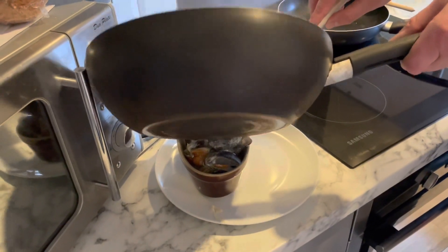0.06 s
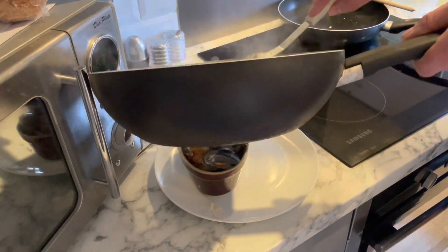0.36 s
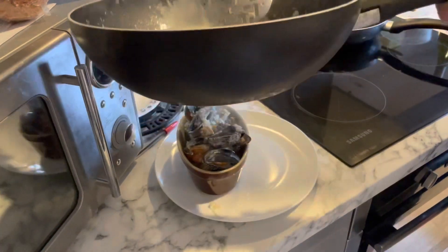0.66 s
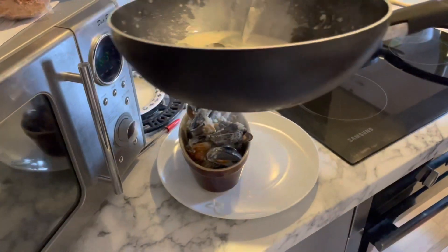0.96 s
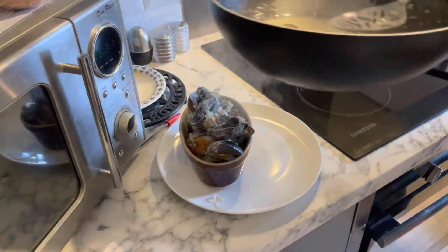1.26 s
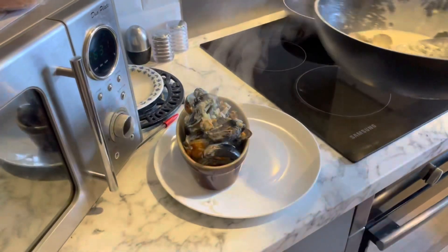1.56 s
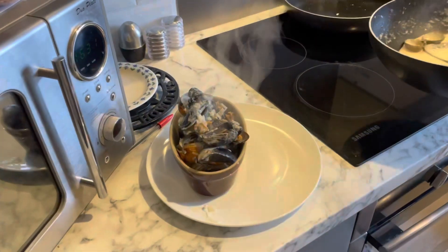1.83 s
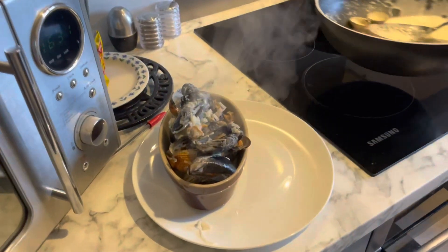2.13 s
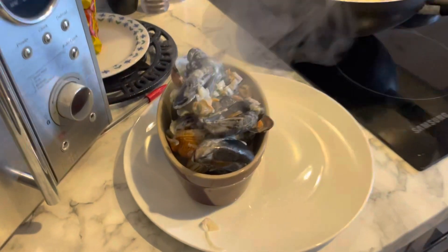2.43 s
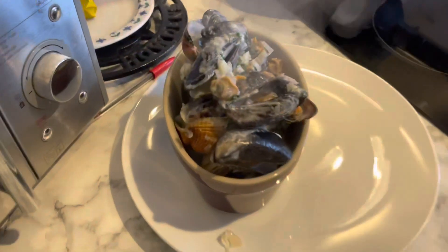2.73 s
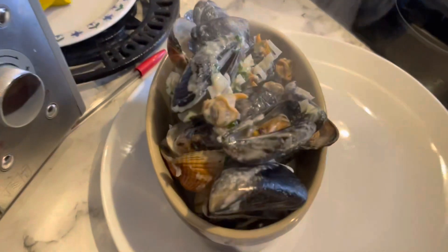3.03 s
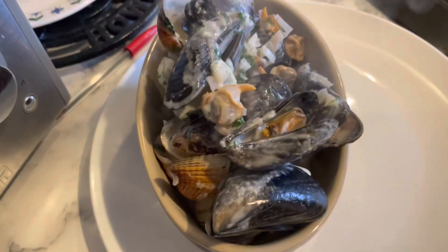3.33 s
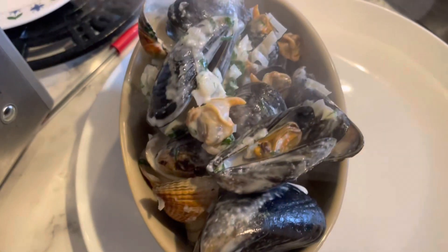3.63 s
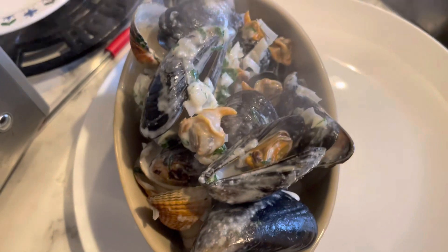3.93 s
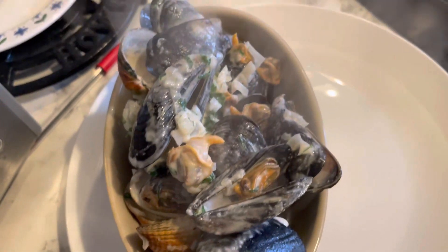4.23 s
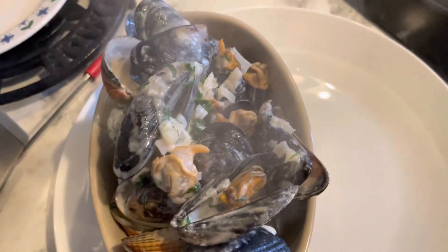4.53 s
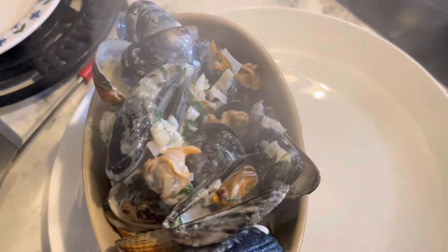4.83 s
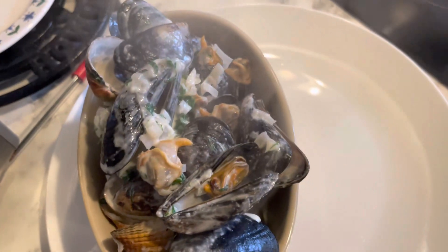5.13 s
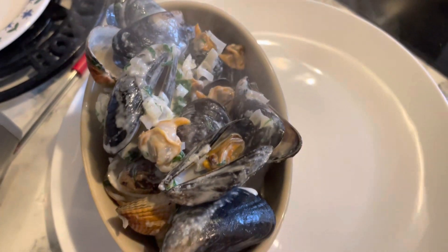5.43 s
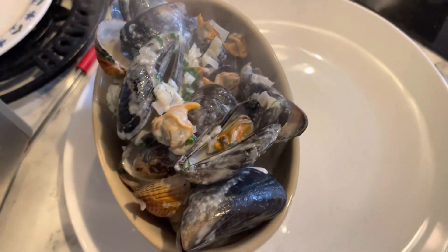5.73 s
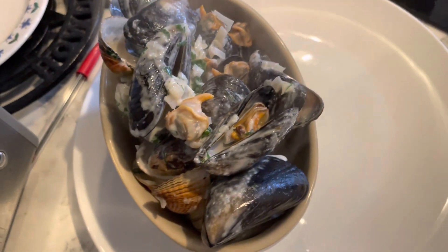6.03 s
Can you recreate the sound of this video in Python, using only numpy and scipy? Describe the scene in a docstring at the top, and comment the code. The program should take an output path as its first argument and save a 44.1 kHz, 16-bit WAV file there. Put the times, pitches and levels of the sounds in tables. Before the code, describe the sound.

A fan hums in a small kitchen while a hot dish hisses faintly. Crockery clinks once and a spoon knocks several times in a metal pan. The pan scrapes, taps and lands on a glass hob with a loud clatter. Soft handling thuds and rustling clothes follow right at the hand-held phone's microphone, and among them a wooden cupboard door shuts further off with a dull knock.

```python
"""A small kitchen, heard from a hand-held phone; a fan hums and a hot dish hisses faintly throughout.
A spoon knocks in a pan just emptied of shellfish, and crockery clinks once. Carried back to the glass
hob, the pan scrapes, taps and lands with a clatter at 2.5 s, as the phone moves in close over the dish.
Then come soft thuds of handling and the rustle of clothes, right at the microphone; amid them,
at 4.6 s, a cupboard door shuts further off with a dull wooden knock."""
import sys
import numpy as np
from scipy import signal
from scipy.fft import rfft, irfft, next_fast_len
from scipy.io import wavfile

SR = 44100
rng = np.random.default_rng(int(sys.argv[2]) if len(sys.argv) > 2 else 0)


def dump(signal):
    """Clip the signal to [-1, 1] and save it as 16-bit WAV at the path in sys.argv[1]."""
    limited = np.clip(np.atleast_2d(signal).T, -1, 1)
    pcm = np.round(limited * 32767).astype(np.int16)
    wavfile.write(sys.argv[1], SR, pcm)


N = 272538
TIME = np.arange(N) / SR
AGE = np.arange(SR // 2) / SR  # seconds since a blow

# the pan's wall: (frequency [Hz], level [dB], t60 [s])
PAN_MODES = [(665, -0.5, 0.78), (698, 4.5, 0.5), (1152, 9.5, 0.19), (1228, 3, 0.69), (1266, -4, 0.22),
             (1522, 7, 0.18), (1580, -0.5, 0.18), (1970, 3, 0.24), (2174, 2, 0.16), (2410, -17, 0.12),
             (2456, 12, 0.08), (2650, 1, .15), (2880, 8, 0.19), (2970, 0, 0.16), (3300, -4, 0.15),
             (3400, 3.5, 0.24), (3760, -2, .13), (4130, 2.5, 0.35), (4420, -3, 0.2), (4856, 0, 0.23),
             (5350, 6, 0.13), (6050, 4, 0.23), (6560, 8, .14)]
# cloth and fingers close to the microphone: (frequency [Hz], level [dB])
RUB_SPECTRUM = [(200, 9), (500, -7.5), (1200, -2), (2800, 2), (4500, 1.5), (7000, -1), (9000, 6.5),
                (11500, 8.5), (13500, 3), (16000, -14)]
SLOSH, SLOSH_PER_S = .011, 110  # sauce in the pan makes each mode waver: share of its pitch, turns per s


def undb(db):
    """Decibels to gain."""
    return 10 ** (np.asarray(db) / 20)


def unit(x):
    """Scale to rms 1."""
    return x / np.sqrt(np.mean(x ** 2))


def unit_hit(x):
    """Scale a blow so that its energy equals rms 1 held for 30 ms."""
    energy = np.sum(np.mean(np.atleast_2d(x) ** 2, axis=0))
    return x / np.sqrt(energy / (.03 * SR))


def at_hz(points, hz):
    """Read (frequency [Hz], value) points on a log-frequency axis."""
    point_hz, value = np.transpose(points)
    return np.interp(np.log(hz + 1), np.log(point_hz), value)


def colour(x, spectrum, tilt_db=0):
    """Causal filter with the given spectrum, tilted by some dB an octave."""
    size = 2 * next_fast_len(x.shape[-1] // 2 + 2048)
    hz = np.arange(size // 2 + 1) * SR / size
    db = at_hz(spectrum, hz) + tilt_db * np.log2(np.maximum(hz, 200) / 1000)
    cepstrum = irfft(np.log(undb(db)))
    cepstrum[1:size // 2] *= 2  # fold to minimum phase
    cepstrum[size // 2 + 1:] = 0
    return irfft(rfft(x, size) * np.exp(rfft(cepstrum)))[..., :x.shape[-1]]


def fade(t60):
    """Free decay of 60 dB in t60 seconds."""
    return np.exp(-np.log(1000) * AGE / t60)


def damped_sine(hz, t60):
    """One freely decaying mode."""
    return fade(t60) * np.sin(2 * np.pi * hz * AGE)


def stroke(s, length, attack, release_t60):
    """Envelope of a sliding contact: it swells, then dies away once its length is up."""
    age = TIME - s
    swell = np.clip(age / attack, 0, 1) ** 2
    return swell * np.exp(-np.log(1000) * np.maximum(age - length, 0) / release_t60)


def walk(per_s, time=TIME):
    """Random wandering with a spread near 1."""
    knots = rng.standard_normal(8192)
    return np.interp(time * per_s, np.arange(len(knots)), knots)


def add(out, s, sound):
    """Mix a stereo sound in at time s."""
    start = max(int(s * SR), 0)
    out[:, start:start + sound.shape[1]] += sound[:, :N - start]


def spread(mid, side):
    """Left and right; long waves reach both microphone ports much alike."""
    # stereo width: (frequency [Hz], side re mid [dB])
    width = [(40, -9.5), (125, -11), (250, -14.5), (500, -2), (1000, -3.5), (4000, -5.5), (10000, 0.5),
             (14000, -21.5)]
    side = colour(side, width)
    return np.array([mid + side, mid - side])


def in_kitchen(x, wet_db):
    """A blow plus dense reflections from tiles and worktop, scaled as a unit hit."""
    # the room's decay, longest in the bass: (frequency [Hz], t60 [s])
    room_t60 = [(100, 0.52), (500, 0.43), (2000, 0.28), (6000, 0.31), (14000, 0.26)]
    hz, s, cells = signal.stft(rng.standard_normal((2, len(AGE))), SR, nperseg=256)
    cells = cells * np.exp(-np.log(1000) * s / at_hz(room_t60, hz)[:, None])
    tail = signal.istft(cells, SR)[1][:, :len(AGE)] * (AGE > .0008)
    tail = tail * (1 + 2.6 * fade(0.05))  # nearby surfaces answer first and loudest
    response = undb(wet_db) * spread(*tail) / np.sqrt(np.sum(tail ** 2))
    response[:, 0] += 1  # direct sound
    return unit_hit(signal.fftconvolve(x[None], response, axes=1)[:, :len(x)])


def ring(modes, scatter_db=1, waver=0):
    """Decaying modes; each radiates its own pattern and reaches the two ports in different phase."""
    chance = rng.uniform(-1, 1, (len(modes), 3))
    port_phase = np.array([[1], [-1]]) * np.pi / 3
    out = 0
    for (hz, db, t60), (sign, scatter, lead) in zip(modes, chance):
        clock = AGE + waver * np.cumsum(walk(SLOSH_PER_S, AGE)) / SR
        gain = np.sign(sign) * undb(db + scatter_db * scatter)
        out = out + gain * fade(t60) * np.sin(2 * np.pi * hz * clock + lead * port_phase)
    return unit_hit(out * (1 - np.exp(-AGE / 0.0032)))


def crack(spectrum, t60, tilt_db=0, *, snap, wet_db):
    """A sharp contact of strength snap, then a crowd of heavily damped modes, heard in the room."""
    burst = rng.standard_normal(len(AGE)) * fade(t60)
    burst[0] = snap * np.sqrt(np.sum(burst ** 2))
    return in_kitchen(colour(burst, spectrum, tilt_db), wet_db)


def friction(spectrum, grain_db, jerk_db, jerks_per_s):
    """Countless tiny slips of uneven size, coming in jerks."""
    size = np.minimum(rng.exponential(size=N), 4)
    noise = rng.standard_normal((2, N))
    slips = noise * undb(grain_db * size + jerk_db * np.tanh(walk(jerks_per_s)))
    return unit(spread(*colour(slips, spectrum)))


def nearness():
    """0 while the phone stands back, 1 once it has moved in over the dish."""
    return np.interp(TIME, (2.3, 3.3), (0, 1))


def free_to_ring():
    """Gain of the pan's sound: full in the hand, 7 dB down once the glass chokes the wall."""
    return undb(np.interp(TIME, (2.555, 2.59), (0, -7)))


def fan():
    """Rumbling air, housing resonances and wavering mains hum; air and hum grow as the phone nears."""
    # moving air: (frequency [Hz], level [dB])
    air_spectrum = [(22, -46), (38, -14), (58, 3), (80, 0.5), (110, -0.5), (170, 4.5), (250, -4),
                    (350, -10), (520, -21.5), (1400, -23), (1750, -26), (2150, -32.5), (3500, -33.5),
                    (7000, -45.5), (12000, -55), (16000, -81)]
    # the fan's housing: (frequency [Hz], bandwidth [Hz], level [dB])
    housing_modes = [(334.6, 9, -52.5), (677.4, 4.3, -61), (1320, 240, -60), (2040, 390, -56),
                     (2400, 80, -80), (3880, 430, -66)]
    # mains hum before the phone moves in: (frequency [Hz], level [dB])
    hum_partials = [(100.3, -43), (200, -47.5)]
    air_db, air_near_db, hum_near_db = -38, 3, 4.5
    air = unit(spread(*colour(rng.standard_normal((2, N)), air_spectrum))) * undb(walk(9.9))
    housing = hum = 0
    for hz, width, db in housing_modes:
        resonance = signal.lfilter(*signal.iirpeak(hz, hz / width, SR), rng.standard_normal((2, N)))
        housing += undb(db) * unit(spread(*resonance))
    for hz, db in hum_partials:
        peak = np.sqrt(2) * undb(db + 3.7 * walk(7.8))
        hum += peak * np.sin(2 * np.pi * hz * TIME + .5 * walk(3.0))
    return air * undb(air_db + air_near_db * nearness()) + housing + hum * undb(hum_near_db * nearness())


def dish_hiss():
    """The hot dish hisses faintly, louder as the pan swings clear and as the phone nears."""
    # the steaming dish: (frequency [Hz], level [dB])
    steam_spectrum = [(1000, -11), (2500, 9.5), (5000, -2.5), (8000, 0), (12000, 2.5), (14000, -12),
                      (16000, -59)]
    covered_db = np.interp(TIME, (0.82, 1.4), (-4, 0))
    db = -60 + 1.5 * nearness() + covered_db
    steam = unit(spread(*colour(rng.standard_normal((2, N)), steam_spectrum)))
    return steam * undb(db + 0.82 * walk(13))


def pan_knocks():
    """A spoon knocks in the pan, then the lowered pan taps the hob; each contact clicks and rings."""
    # knock on metal: (frequency [Hz], level [dB])
    click_spectrum = [(200, -35), (600, -4), (1500, 8), (3500, 9), (6000, 1), (9000, 3), (13000, -9.5),
                      (16000, -34)]
    # knocks: (time [s], level [dB], tilt [dB/octave], ring re click [dB], ring centre [Hz],
    # damping t60 [s], note [Hz], note re click [dB], note t60 [s])
    knocks = [(.054, -41.5, -7.5, -11, 700, .5, 1270, -5, 0.086),
              (1.246, -31.5, 0.5, -0.5, 420, 7.2, 1107, 0, 0.053),
              (1.412, -51.5, -0.5, 7, 1100, .5, 1220, 11, .08), (1.546, -46, -1, 5, 1400, .5, 1227, 1, .12),
              (1.605, -28, -1, 2, 2300, 0.89, 1230, -0.5, 0.17),
              (1.631, -29, -1, -2, 1500, .9, 1246, 6, 0.14),
              (1.670, -34, -5, 14, 1200, 0.33, 1179, 16, 0.11),
              (1.787, -32, 2, 2.5, 3350, 2.1, 2335, -7, 0.05),
              (1.919, -55, 13.5, -12, 5000, .1, 5540, 15, 0.0096),
              (2.418, -41.5, -2, -2, 914, .4, 680, 6, 0.09),
              (2.467, -29.5, -3.5, -3, 900, 0.33, 695, 3, 0.24),
              (2.491, -28.5, -5.5, 4, 1490, .35, 678, 4, 0.22),
              (2.504, -30, -10, 9, 1800, 0.19, 1230, 13, 0.18),
              (2.535, -35.5, -8, -2, 1200, .2, 1212, 16, .13)]
    rebound_s, rebound_db = 0.0099, -6
    focus_db = 5.5  # lost per octave from the modes that the struck spot favours
    out = np.zeros((2, N))
    for s, db, tilt_db, ring_db, centre_hz, damping_t60, note_hz, note_db, note_t60 in knocks:
        click, rebound = (crack(click_spectrum, 0.021, tilt_db, snap=0.43, wet_db=10) for _ in range(2))
        rebound = np.pad(rebound, ((0, 0), (int(rebound_s * SR), 0)))[:, :len(AGE)]
        clicks = unit_hit(click + undb(rebound_db) * rebound)
        note = in_kitchen(damped_sine(note_hz, note_t60), wet_db=-1)
        favoured = [(hz, mode_db - focus_db * abs(np.log2(hz / centre_hz)), t60)
                    for hz, mode_db, t60 in PAN_MODES]
        wall = ring(favoured, scatter_db=1.5, waver=SLOSH) * fade(damping_t60)
        # reflections make the ring swell and beat
        wall = unit_hit(unit_hit(wall) + undb(-4) * in_kitchen(wall[0], wet_db=12))
        add(out, s, undb(db) * unit_hit(clicks + undb(ring_db) * wall + undb(note_db) * note))
    return out * free_to_ring()


def thud(centre_hz, focus_db=27, rise_s=0.0049):
    """A soft push rumbles and swells the worktop's modes, focus_db weaker per octave off its own pace."""
    # the worktop and the units under it: (frequency [Hz], level [dB], t60 [s])
    worktop_modes = [(66.1, 0, 0.58), (100.6, 3.5, 0.32), (116, -10.5, 1), (164.8, 0, 0.48),
                     (203.2, 3, 0.31), (332.3, -5, 0.57), (384, -16, 0.48), (400, -11, 0.35)]
    # the short rumble: (frequency [Hz], level [dB])
    rumble_spectrum = [(30, -20.5), (60, -5.5), (170, 2), (260, -16.5), (400, -17.5), (700, -33.5),
                       (1500, -41), (5000, -78)]
    boom = sum(undb(db - focus_db * abs(np.log2(hz / centre_hz))) * damped_sine(hz, t60)
               for hz, db, t60 in worktop_modes)
    rumble = crack(rumble_spectrum, 0.24, snap=0, wet_db=-1.5)
    return unit_hit((unit_hit(boom) + undb(-6) * rumble) * (1 - np.exp(-AGE / rise_s)))


def phone_bumps():
    """Handling noise: each jog ticks and knocks on the phone's case; a low thud follows."""
    # jogs: (time [s], tick [dB], tick tilt [dB/octave], knock [dB], thud [dB], thud centre [Hz])
    jogs = [(.054, -53, -3.5, -51, -27, 101), (2.135, -43, -6.5, -42, -30.5, 168),
            (3.169, -46.5, -2, -33, -21, 100), (3.295, -30.5, -5, -32.5, -21, 86.4),
            (3.355, -49, -5, -41, -28.5, 79), (3.502, -66, -5, -39.5, -38, 111),
            (3.623, -60, -5, -39.5, -34, 110), (4.114, -28, -2, -37.5, -16, 74),
            (4.341, -32.5, -5, -46, -32.5, 100), (4.403, -33.5, -2, -44, -51, 100),
            (4.476, -32.5, 1, -41, -20.5, 98), (5.134, -51, -0.5, -43, -27, 76),
            (5.6542, -43, -1, -49, -23, 101), (6.045, -41, -10, -49, -30, 95.5)]
    # the hollow case under the fingers: (frequency [Hz], level [dB])
    case_spectrum = [(100, 4), (200, 1.5), (380, 1), (600, -3.5), (1000, -17), (2500, -19), (6000, -41)]
    thud_lag_s = .016
    out = np.zeros((2, N))
    for s, tick_db, tilt_db, knock_db, thud_db, centre_hz in jogs:
        add(out, s, undb(tick_db) * crack(RUB_SPECTRUM, 0.045, tilt_db, snap=0.92, wet_db=10.5))
        add(out, s, undb(knock_db) * crack(case_spectrum, 0.16, snap=0.1, wet_db=2))
        add(out, s + thud_lag_s, undb(thud_db) * thud(centre_hz))
    return out


def crockery():
    """A piece of crockery is bumped once and gives a hollow, dry clink."""
    # the contact: (frequency [Hz], level [dB])
    knock_spectrum = [(400, -11), (680, -10), (900, -2), (1400, 10), (1750, -11), (2200, 8), (2550, -12),
                      (3200, -4), (3800, -27), (4400, -19), (6000, -41), (14000, -47)]
    # the crockery's ring: (frequency [Hz], level [dB], t60 [s])
    crockery_modes = [(743, -5.5, .9), (783, 6, 0.053), (929, 8.5, 0.072), (1260, -3, 0.42), (1310, 1, .07),
                      (1410, 7, 0.19), (2210, -8, 0.25), (2050, -22, 0.46), (2300, 1, 0.034),
                      (2700, 2, 0.054), (3130, -3, 0.14), (3110, -10, .08), (4300, -10, .06),
                      (5620, -36, .08)]
    clink_s, clink_db = .607, -30.5
    out = np.zeros((2, N))
    knock = crack(knock_spectrum, 0.024, snap=1, wet_db=8)
    add(out, clink_s, undb(clink_db) * unit_hit(knock + undb(-0.5) * ring(crockery_modes)))
    return out


def pan_scrape():
    """The pan drags, then grinds as its weight comes down; its wall sings along, damped by the glass."""
    # slides: (time [s], length [s], attack [s], level [dB])
    slides = [(2.083, 0.66, 0.29, -41), (2.451, 0.029, 0.038, -31.5)]
    # pan base on glass: (frequency [Hz], level [dB])
    scrape_spectrum = [(150, 14), (500, 5), (900, 4.5), (2000, 2), (3000, -4.5), (3900, -8), (5500, -6),
                       (8000, -18), (12500, -12.5), (16000, -50)]
    drag = sum(undb(db) * stroke(s, length, attack, release_t60=0.14) for s, length, attack, db in slides)
    scrape = friction(scrape_spectrum, grain_db=6.5, jerk_db=1.5, jerks_per_s=190) * drag
    wall = ring(PAN_MODES, waver=SLOSH) * fade(t60=0.33)
    sing = signal.fftconvolve(scrape, wall / np.sqrt(np.sum(wall ** 2)), axes=1)[:, :N]
    return scrape + undb(-4.5) * sing * free_to_ring()


def pan_landing():
    """The pan lands and rocks: the glass top clacks, rings and bends, and the worktop booms under it."""
    # blows: (time [s], level [dB], tilt [dB/octave], t60 [s], edge re clack [dB], thud [dB],
    # thud centre [Hz], flex [dB])
    landings = [(2.489, -28.5, -4.5, 0.12, -14, -20, 140, -33.5),
                (2.618, -18, -1.5, 0.02, -1.5, -23, 130, -21),
                (2.6244, -21.5, -2, 0.13, -8, -13, 66.5, -24), (2.645, -30, 0.5, 0.24, -13, -27, 67, -33),
                (2.678, -25, -0.5, 0.016, -7, -22, 100, -21), (2.7224, -23.5, 0, 0.01, -20, -19.5, 71, -24),
                (2.731, -26, -4.5, 0.1, -22, -20.5, 69.6, -20),
                (3.169, -30.5, -4.5, 0.11, -20, -37, 66, -37)]
    # the struck hob: (frequency [Hz], level [dB])
    hob_spectrum = [(60, -2), (200, 4), (360, 0), (480, -4), (560, -2.5), (640, 7), (790, -7.5), (950, 2.5),
                    (1350, -1.5), (2000, -4.5), (3100, -8.5), (5000, -14.5), (7500, -16), (12000, -19),
                    (16000, -50)]
    # the edge of the pan's base hitting: (frequency [Hz], level [dB])
    edge_spectrum = [(300, -10), (700, -7), (950, -1), (1350, 8.5), (2000, 0), (3300, -1.5), (4400, -7),
                     (14000, -41)]
    # glass top and pan base together: (frequency [Hz], level [dB], t60 [s])
    hob_modes = [(664, -3, .18), (930, -1, 0.14), (1265, 9, 0.076), (1320, 12, 0.14), (1540, -14, 0.13),
                 (1990, -8, 0.12), (2580, -3, 0.15), (2890, -7, .07), (3230, -12, 0.067), (3570, -11, .17)]
    # the hob bending: (frequency [Hz], level [dB], t60 [s])
    flex_modes = [(151.6, 4.5, 0.054), (194, -8, 0.054), (340.5, -4.5, 0.14), (374.5, -6, 0.11),
                  (496, -7.5, 0.097)]
    rise_s, weight_t60 = 0.0027, 0.43  # the pan's weight damps the ring
    flex = sum(undb(db) * damped_sine(hz, t60) for hz, db, t60 in flex_modes)
    flex *= 1 - np.exp(-AGE / rise_s)
    out = np.zeros((2, N))
    for s, db, tilt_db, t60, edge_db, thud_db, thud_hz, flex_db in landings:
        clack = crack(hob_spectrum, t60, tilt_db, snap=0.27, wet_db=5)
        edge = crack(edge_spectrum, 0.019, snap=0.97, wet_db=7.5)
        hob_ring = unit_hit(ring(hob_modes, waver=SLOSH) * fade(weight_t60))
        blow = clack + undb(edge_db) * (edge + undb(-5.5) * hob_ring)
        add(out, s, undb(db) * blow + undb(flex_db) * in_kitchen(flex, wet_db=-3))
        add(out, s, undb(thud_db) * thud(thud_hz, focus_db=7.5, rise_s=rise_s))
    return out


def rustle():
    """Cloth hisses by the microphone as fibres catch and let go; firm rubs scuff and the hand rumbles."""
    # clothes and fingers: (time [s], length [s], attack [s], relative level [dB], scuff gain [dB])
    rubs = [(3.187, .04, 0.025, -56, 5), (3.655, .03, .02, -62, 0), (3.782, 0.042, 0.031, -69.5, 21),
            (4.11, 0.047, 0.0051, -49, 0), (4.177, 0.12, 0.022, -55, -9), (4.416, 0.062, .01, -41, 1.5),
            (4.474, 0.026, 0.0044, -42.5, 8), (4.507, 0.095, 0.037, -38.5, 5.5),
            (4.61, 0.026, .015, -49, -8), (4.785, 0.033, .02, -58, 7), (4.88, 0.057, 0.028, -58, 0),
            (5.046, .05, 0.028, -57, -7), (5.455, .06, 0.036, -58, -4), (5.747, 0.081, .06, -58, -6),
            (5.814, 0.2, 0.15, -40, -24), (5.987, 0.058, 0.069, -33.5, -3.5),
            (6.124, 0.056, 0.025, -43, -6)]
    # low scuffing: (frequency [Hz], level [dB])
    scuff_spectrum = [(150, 7.5), (350, -13), (700, -1.5), (1200, -3), (1900, -3), (2800, -2.5), (4000, -7),
                      (12000, -17)]
    # the hand shifting its grip: (frequency [Hz], level [dB])
    grip_spectrum = [(60, -38), (150, -9), (350, 5), (600, -16), (1200, -10), (4000, -19)]
    snaps_per_s, snap_t60 = 130, .009
    sliding, pressing = np.zeros(N), np.zeros(N)
    for s, length, attack, db, scuff_db in rubs:
        rub = undb(db) * stroke(s, length, attack, release_t60=0.3)
        sliding += rub
        pressing += undb(scuff_db) * rub
    cloth = friction(RUB_SPECTRUM, grain_db=3.5, jerk_db=3.5, jerks_per_s=300)
    scuff = friction(scuff_spectrum, grain_db=8, jerk_db=-4.5, jerks_per_s=230)
    grip = friction(grip_spectrum, grain_db=9, jerk_db=7, jerks_per_s=23)
    catches = (rng.random(N) < snaps_per_s / SR) * rng.standard_normal((2, N))
    snap_envelope = signal.fftconvolve(abs(catches), fade(snap_t60)[None], axes=1)[:, :N]
    snaps = rng.standard_normal((2, N)) * snap_envelope
    crackle = unit(spread(*colour(snaps, RUB_SPECTRUM, tilt_db=-1.5)))
    return (undb(1.5) * cloth + crackle) * sliding + (scuff + undb(-4) * grip) * pressing


def seam_scratches():
    """A seam catches in short scratches that stand out of the rustle."""
    # catches: (time [s], level [dB])
    catches = [(4.1497, -40), (4.192, -43), (4.4411, -43), (4.487, -38), (4.5331, -37), (4.5524, -31),
               (4.564, -40), (5.866, -46), (5.914, -52), (5.9772, -41), (6.017, -57), (6.0247, -39),
               (6.0508, -35), (6.065, -32.5), (6.079, -37), (6.1395, -50), (6.1536, -44)]
    out = np.zeros((2, N))
    for s, db in catches:
        add(out, s, undb(db) * crack(RUB_SPECTRUM, 0.01, snap=0.12, wet_db=12))
    return out


def cupboard_door():
    """Further off, a wooden door shuts and rebounds; its panel rings briefly and shakes the units."""
    # knock and rebound: (time [s], level [dB], t60 [s])
    knocks = [(4.6381, -19.5, 0.03), (4.654, -24.5, 0.093)]
    # the dull wooden contact: (frequency [Hz], level [dB])
    wood_spectrum = [(80, -11), (250, 2.5), (520, -6.5), (680, -6.5), (1000, 2), (1430, -13.5), (1700, -4),
                     (2000, -3.5), (2350, -9), (2700, -6.5), (3200, -21), (5000, -30.5), (12000, -31),
                     (16000, -58)]
    # the door's panel: (frequency [Hz], level [dB], t60 [s])
    panel_modes = [(893, -10, 0.4), (989, 4, 0.21), (1123, 4, 0.15), (1720, -12, 0.068), (1896, 4, 0.1),
                   (2080, 8, .08), (2700, 4, 0.087)]
    out = np.zeros((2, N))
    for s, db, t60 in knocks:
        knock = crack(wood_spectrum, t60, snap=0.21, wet_db=6.5)
        add(out, s, undb(db) * (knock + undb(-9) * ring(panel_modes)))
    add(out, knocks[0][0], undb(-22) * thud(centre_hz=68))
    return out


def scene():
    """All sources at the microphone; the fan and the bumps lean a little to the right."""
    lean_db = 1.36
    leaning = (fan() + phone_bumps()) * undb(np.array([[-lean_db], [lean_db]]) / 2)
    return (leaning + dish_hiss() + pan_knocks() + crockery() + pan_scrape() + pan_landing()
            + cupboard_door() + rustle() + seam_scratches())


def record(dry):
    """The phone's two ports oppose each other in one treble band; deep bass and the very top are cut."""
    # response to sound common to both ports: (frequency [Hz], gain [dB])
    port_response = [(20, -0.5), (7000, -1.5), (7800, -10.5), (8500, -34.5), (9300, -12), (10200, -5),
                     (20000, 1.5)]
    low_cut_hz, top_hz = 45, 16000
    mid = colour((dry[0] + dry[1]) / 2, port_response)
    side = (dry[0] - dry[1]) / 2
    stereo = np.array([mid + side, mid - side])
    stereo = signal.sosfilt(signal.butter(4, low_cut_hz, "high", fs=SR, output="sos"), stereo)
    return signal.sosfilt(signal.ellip(8, .2, 70, top_hz, fs=SR, output="sos"), stereo)


dry = scene()
out = record(dry)
dump(out)
```